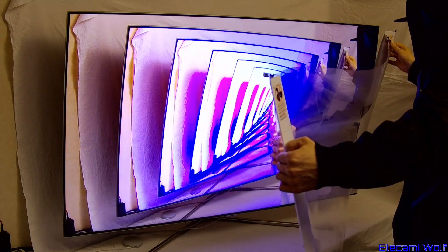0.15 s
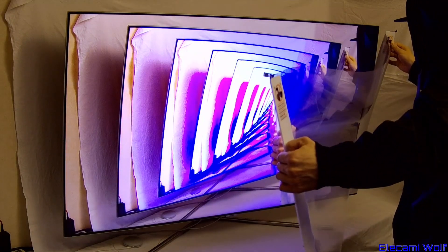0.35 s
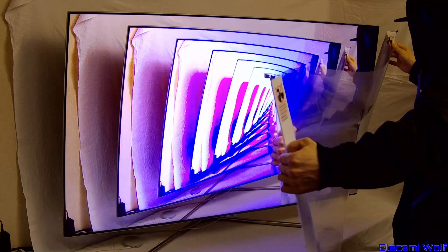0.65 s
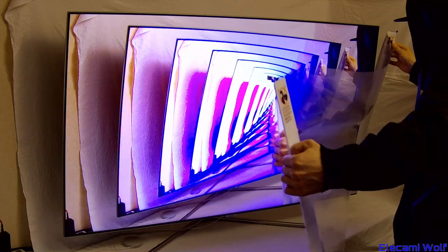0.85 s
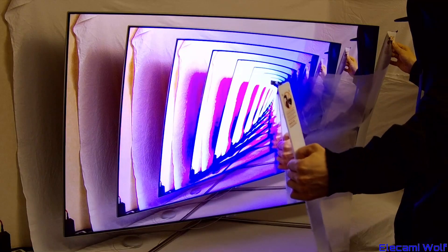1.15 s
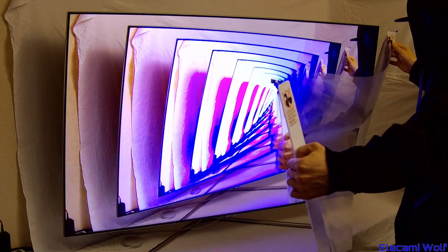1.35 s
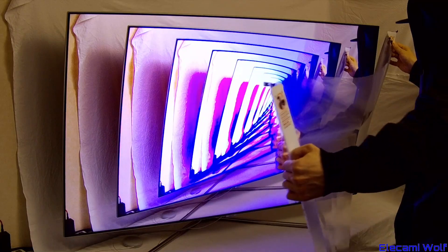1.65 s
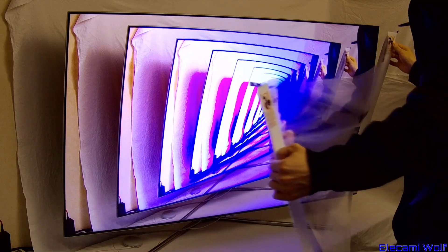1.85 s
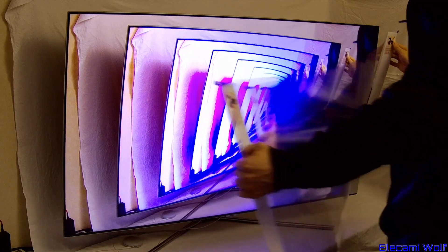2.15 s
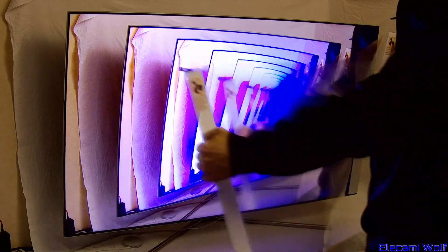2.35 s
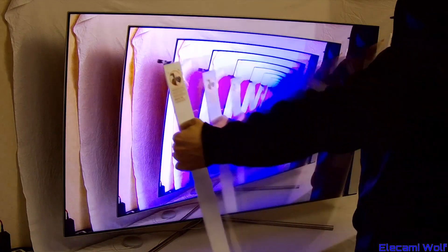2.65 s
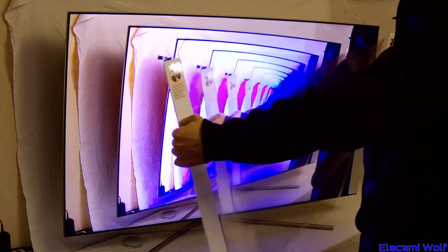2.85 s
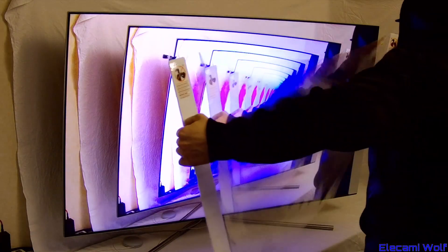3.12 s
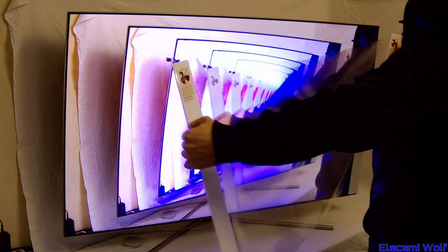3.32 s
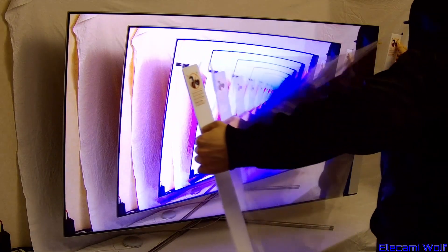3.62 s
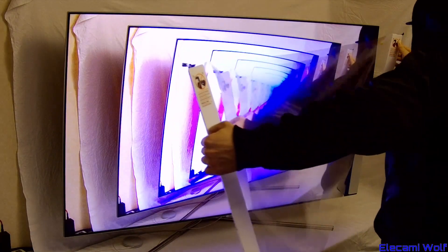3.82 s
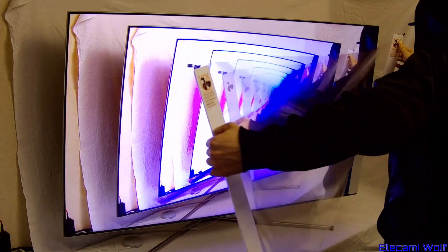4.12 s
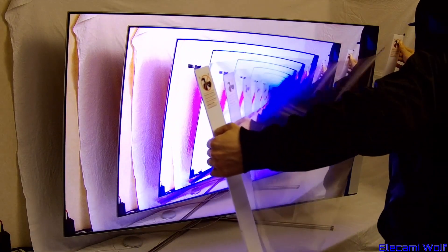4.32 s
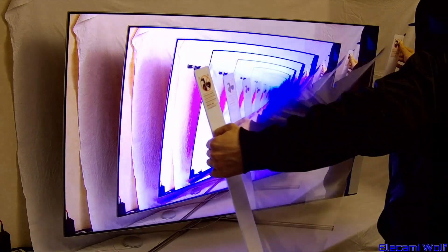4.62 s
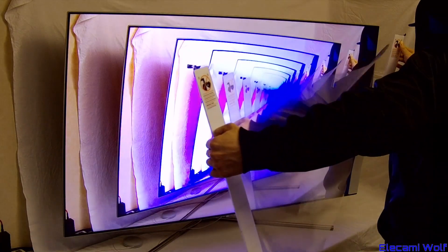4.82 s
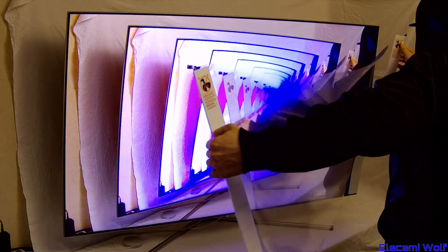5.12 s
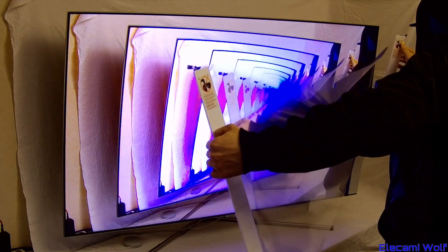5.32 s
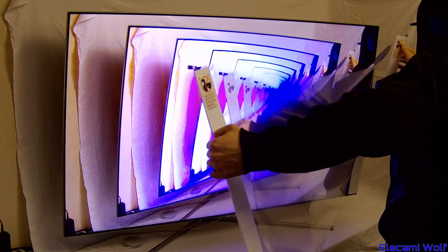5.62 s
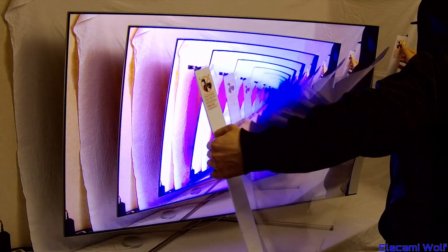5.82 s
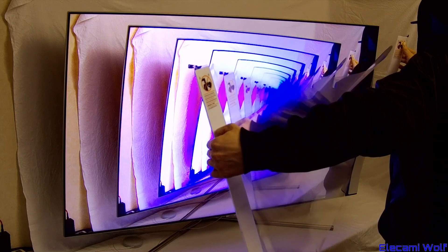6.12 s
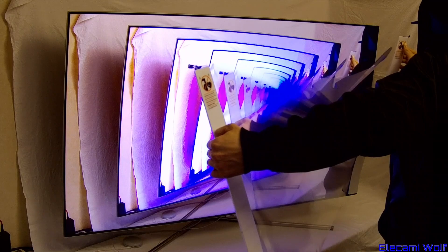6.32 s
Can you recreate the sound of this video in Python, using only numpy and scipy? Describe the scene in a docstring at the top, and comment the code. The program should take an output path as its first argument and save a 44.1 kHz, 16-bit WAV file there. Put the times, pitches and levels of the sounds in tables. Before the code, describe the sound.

Protective plastic is pulled from a big screen indoors, ticking and snapping, crackling steadily for a while, then giving a few last clicks.

```python
"""Protective plastic film peels off a large screen in a small room.
After a faint creep the taut sheet lets go in single snaps, then in a dense run of tiny slips
that rasp more as the pull grows. The loose film crinkles and billows once.
Screen and walls echo it over room air and faint mains hum; an expander turns the pauses down."""
import sys
import numpy as np
from scipy import signal
from scipy.fft import rfft, irfft
from scipy.io import wavfile

SR = 44100
rng = np.random.default_rng(int(sys.argv[2]) if len(sys.argv) > 2 else 0)


def master(y):
    """Save y as 16-bit WAV."""
    cut = np.clip(np.atleast_2d(y).T, -1, 1)
    pcm = np.round(cut * 32767)  # scale
    wavfile.write(sys.argv[1], SR, pcm.astype(np.int16))


N = 285092
TIME_S = np.arange(N) / SR

# room air spectrum: freq_hz, gain_db
AIR_SPECTRUM = [(20, -39), (32, -21), (45, -11.5), (130, -6), (250, -1.5), (420, 1), (600, -6), (790, -6.5),
                (1050, -12), (2500, -20), (4800, -27), (7000, -39), (15000, -57.5)]
# mains hum and faint steady tones: pitch_hz, level_db
HUM_TONES = [(50, -62.5), (100, -66), (150, -73.5), (241, -63.5), (434, -67.5), (785, -68)]
# glue rasp spectrum: freq_hz, gain_db
RASP_SPECTRUM = [(500, -9), (1200, 5.5), (1900, 3.5), (2700, -2.5), (4000, -14), (6300, -31.5),
                 (9000, -46.5), (12000, -53), (16000, -60.5)]
# film patches letting go: start_s, level_db, ring_hz, crack_gain_db, release_ms
SNAP_EVENTS = [(0.633, -45, 1250, -31, 1.8), (0.801, -34.5, 1620, -27, 1.8), (1.021, -43, 980, -9, 1.1),
               (1.06, -55, 2100, -15, 0.61), (1.259, -59.5, 1680, -28, 0.51), (1.563, -63, 1900, -10, 1.2),
               (1.634, -45.5, 1450, -31, 3), (1.677, -17, 1740, -3.5, 1.5), (1.709, -29, 1630, -18, 1.3),
               (1.907, -31, 1610, -2.5, 0.47), (2.269, -35, 1180, -23, 1.9), (2.651, -27.5, 820, -30, 1.6),
               (2.716, -43, 1900, -11, 0.88), (2.826, -33.5, 1660, -21, 2.2), (2.866, -28, 1260, 0.5, 1.4),
               (2.909, -22, 1490, 0, 1.3), (3.009, -20.5, 1690, 3, 4.4), (3.126, -21, 2070, -13, 1.4),
               (3.168, -29, 1500, -28, 0.98), (3.204, -28, 1390, -6, 3.4), (3.232, -31, 1780, 1.5, 2.6),
               (3.326, -25, 1680, -30, 0.83), (3.484, -32, 1310, -23, 2.1), (3.914, -27, 2090, -22, 0.93),
               (4.0, -42, 1310, 2.5, 2.4), (4.12, -34, 1490, -32, 2.3), (4.2, -40, 1520, -7, 1.6),
               (4.356, -35, 1410, -26, 2), (4.516, -45, 1660, 3, 1.5), (4.552, -15.5, 1950, -18.5, 1.3),
               (5.052, -30.5, 1550, -12, 0.45), (5.091, -41.5, 1390, -4, 0.76),
               (5.751, -48, 1430, -14, 0.8), (6.172, -47, 1800, -12, 2.2), (6.182, -36.5, 1586, -22, 0.58),
               (6.24, -50, 1610, -3, 0.84)]
# treble roll-off of the ringing film: freq_hz, gain_db
RING_SPECTRUM = [(3000, 0.5), (6000, -3.5), (10000, -11), (16000, -23.5)]
# slack sheet flap spectrum: freq_hz, gain_db
FLAP_SPECTRUM = [(50, -13.5), (130, -8.5), (220, -2.5), (420, 3.5), (750, .5), (1100, -15.5), (2500, -24.5),
                 (10000, -64.5)]
# tearing glue spectrum: freq_hz, gain_db
CRACK_SPECTRUM = [(1500, -4.5), (3000, 14.5), (4400, 12), (6500, -1.5), (9000, -10.5), (12000, -27.5),
                  (16000, -43)]
# bright ticks of the film, some the sharp edge of a snap: start_s, level_db, pitch_hz
TICK_EVENTS = [(0.773, -61, 3500), (0.84, -46, 6700), (1.696, -31, 4900), (1.715, -33, 4870),
               (2.287, -47.5, 3180), (2.486, -43.5, 4700), (2.717, -38.5, 5070), (3.242, -41, 3400),
               (3.34, -47, 4200), (3.492, -41.5, 5270), (3.577, -47, 5400), (4.552, -37.5, 7420),
               (5.053, -34, 3800), (5.092, -42.5, 3520), (5.757, -54.5, 4790), (6.174, -44, 5730),
               (6.18, -39.5, 4840), (6.241, -55, 4800)]
# film tick spectrum: freq_hz, gain_db
TICK_SPECTRUM = [(600, -13), (2200, 11), (4000, 1.5), (7000, -3.5), (9000, -7), (12000, -14.5),
                 (16000, -24)]
# pull on the running peel, as drumming level: time_s, level_db
PULL_CURVE = [(1.75, -35), (1.87, -41), (1.98, -39.5), (2.06, -33), (2.2, -36), (2.44, -35), (2.58, -31.5),
              (2.63, -37), (2.77, -40.5), (2.97, -34.5), (3.18, -35.5), (3.33, -41), (3.4, -36),
              (3.57, -39), (3.71, -32.5), (3.84, -40), (4.02, -37.5), (4.08, -45.5), (4.24, -39),
              (4.33, -59.5), (4.431, -45.5), (4.491, -72)]
# drumming sheet spectrum: freq_hz, gain_db
DRUM_SPECTRUM = [(40, -36.5), (70, -15.5), (125, -13), (240, -4.5), (330, -6), (500, 1), (760, 5),
                 (1000, -3), (1700, -12), (2600, -33), (5000, -39.5), (12000, -83.5)]
# screen panel resonances: freq_hz, width_hz, gain_db
PANEL_MODES = [(818, 28, -5.5), (1630, 30, -21.5), (1930, 70, -8), (2338, 40, -40), (4550, 12, -21),
               (4750, 68, -17.5), (5000, 13, -11)]
# echoes off screen, floor and walls: delay_s, gain_db
ECHO_PATHS = [(.0029, -8), (.0063, -8), (.0098, -20.5), (.0160, -7), (0.0362, -21.5)]
# diffuse room tail: freq_hz, t60_s, gain_db
ROOM_BANDS = [(120, 0.7, 7.5), (390, 0.46, 7), (890, 0.34, 0.5), (2050, 0.24, -5.5), (4500, 0.23, -4.5),
              (8740, 0.17, -4.5), (15000, 0.094, -11)]


def undb(db):
    """Decibels to gain."""
    return 10 ** (np.asarray(db) / 20)


def unit_rms(x):
    """Scale to rms 1."""
    return x / np.sqrt(np.mean(x ** 2) + 1e-30)


def log_interp(hz, points):
    """Interpolate (freq_hz, value) rows over log frequency."""
    freq_hz, values = np.array(points, float).T
    return np.interp(np.log(np.maximum(hz, 1)), np.log(freq_hz), values)


def colour(x, spectrum, size=2048):
    """Minimum-phase filter; attacks stay sharp."""
    gain = undb(log_interp(np.fft.rfftfreq(size, 1 / SR), spectrum))
    cepstrum = irfft(np.log(gain))
    cepstrum[1:size // 2] *= 2
    cepstrum[size // 2 + 1:] = 0
    response = irfft(np.exp(rfft(cepstrum)))
    return signal.oaconvolve(x, response)[:len(x)]


def bandpass(x, hz, q):
    """Two-pole resonator."""
    omega = 2 * np.pi * min(hz, SR / 2 - SR / 20) / SR
    alpha = np.sin(omega) / (2 * q)
    return signal.lfilter([alpha, 0, -alpha], [1 + alpha, -2 * np.cos(omega), 1 - alpha], x)


def add(track, start_s, x):
    """Mix x into the track."""
    start = max(int(round(start_s * SR)), 0)
    track[start:start + len(x)] += x[:max(len(track) - start, 0)]


def drift(rate_hz):
    """Smooth random drift, spread near 1."""
    knots = rng.standard_normal(N // 100)
    return np.interp(TIME_S * rate_hz, np.arange(len(knots)), knots)


def air_and_hum(air_db=-55.0):
    """Steady room air, mains hum and faint tones."""
    air = unit_rms(colour(rng.standard_normal(N), AIR_SPECTRUM)) * undb(air_db)
    hum = sum(np.sqrt(2) * undb(db) * np.sin(2 * np.pi * hz * TIME_S) for hz, db in HUM_TONES)
    return air + hum


def slips(size, rate_hz, spread_db):
    """Tiny glue releases at random times: many weak, a few strong."""
    chance, rarity = rng.random((2, size))
    fired = np.flatnonzero(chance < rate_hz / SR)
    strength_db = -spread_db * np.log(np.maximum(rarity[fired], .02))
    out = np.zeros(size)
    out[fired] = (-1.) ** fired * undb(strength_db)
    return out


def creep(peak_s=.505, width_s=.064, level_db=-59.5):
    """Under the first light pull, slips rasp faintly, swell and stop."""
    swell = np.exp(-((TIME_S - peak_s) / width_s) ** 2)
    rasp = unit_rms(colour(slips(N, rate_hz=1800, spread_db=2.0), RASP_SPECTRUM))
    return rasp * swell * undb(level_db)


def film_response(push, tear, ring_hz, flap_db, crack_db):
    """A push rings the taut film and flaps the sheet; tearing glue cracks."""
    ring = bandpass(bandpass(push, ring_hz, q=.85), ring_hz, q=1.0)
    ring = unit_rms(colour(ring, RING_SPECTRUM))
    flap = unit_rms(colour(push, FLAP_SPECTRUM)) * undb(flap_db - 2.5)
    crack = unit_rms(colour(tear, CRACK_SPECTRUM)) * undb(crack_db - 7.0)
    # high bending waves run faster: crack first, flap last
    ring = np.pad(ring, (SR // 1500, 0))
    flap = np.pad(flap, (SR // 1000, 0))
    return crack + ring[:len(push)] + flap[:len(push)]


def snaps(tails, typical_db=-35, size=1024):
    """Each patch lets go in an avalanche of slips, milliseconds long."""
    out = np.zeros(N)
    time_ms = 1000 * np.arange(size) / SR
    impulse = signal.unit_impulse(size)
    for k, (start_s, level_db, ring_hz, crack_db, release_ms) in enumerate(SNAP_EVENTS):
        # weak snaps flap the slack sheet, strong ones ring it taut
        flap_db = min(-3 - .5725 * (level_db - typical_db), 4.5)
        age = time_ms / release_ms
        avalanche = slips(size, rate_hz=12000, spread_db=2.0)
        push = avalanche * (age + .067) * np.exp(-age * .51)
        tear = avalanche * np.exp(-age)
        direct = film_response(push, tear, ring_hz, flap_db, crack_db)
        # the room sums all directions, so it gets the smooth average colour
        diffuse = film_response(impulse, impulse, ring_hz, flap_db, crack_db)
        gain = undb(level_db - 4.5)
        add(out, start_s - .0002, gain * with_echoes(direct, echo_db=-3.0, delay_spread=.13))
        add(out, start_s, gain * signal.fftconvolve(diffuse, tails[k % len(tails)]))
    return out


def ticks(tails, size=512):
    """Short bright film ticks with strong echoes: crinkles, lone ticks, sharp edges of snaps."""
    out = np.zeros(N)
    scatter_decay = np.exp(-np.arange(size) / SR / .0007)
    for k, (start_s, level_db, pitch_hz) in enumerate(TICK_EVENTS + crinkle_events()):
        pulse = signal.unit_impulse(size) + .13 * rng.standard_normal(size) * scatter_decay
        tick = undb(level_db) * unit_rms(colour(bandpass(pulse, pitch_hz, q=1.0), TICK_SPECTRUM))
        add(out, start_s + .00071, with_echoes(tick, echo_db=5.0, delay_spread=.023))
        add(out, start_s, undb(3.5) * signal.fftconvolve(tick, tails[k % len(tails)]))
    return out


def peel(tails, typical_db=-34.5, rasp_db_per_db=.57):
    """Slips along the peel line drum on the sheet; rasp outgrows drumming as the pull rises."""
    knots_s, knots_db = np.transpose(PULL_CURVE)
    start_s, end_s = knots_s[0], knots_s[-1]
    running = np.interp(TIME_S, [start_s - .01, start_s, end_s, end_s + .02], [0, 1, 1, 0])
    surge_db = .3 * drift(rate_hz=33)  # glue holds and gives
    pull_db = np.interp(TIME_S, knots_s, knots_db) + surge_db
    rasp_db = pull_db + rasp_db_per_db * (pull_db - typical_db)
    jerk_db = 2.5 * np.tanh(drift(rate_hz=80))
    cluster_db = 4.5 * np.tanh(drift(rate_hz=260))  # slips set off their neighbours
    drum_slips = slips(N, rate_hz=1500, spread_db=4.4)
    rasp_slips = slips(N, rate_hz=1300, spread_db=2.6) * undb(cluster_db)
    drum = unit_rms(colour(drum_slips, DRUM_SPECTRUM)) * undb(pull_db - 4.5)
    rasp = unit_rms(colour(rasp_slips, RASP_SPECTRUM)) * undb(rasp_db - 3.94)
    direct = running * undb(jerk_db) * (drum + rasp)
    return moving_in_room(direct, tails, start_s - .02, end_s + .02)


def moving_in_room(x, tails, start_s, end_s, fade_size=256):
    """The peel line moves: each crossfaded stretch gets its own room response."""
    out = np.zeros(N)
    edges = (np.linspace(start_s, end_s, 3 * len(tails)) * SR).astype(int)
    fade = np.hanning(fade_size) / np.hanning(fade_size).sum()
    for k, (start, end) in enumerate(zip(edges, edges[1:])):
        window = signal.fftconvolve(np.ones(end - start), fade)
        stretch = x[start:start + len(window)] * window
        add(out, start / SR, with_echoes(stretch, echo_db=-3.5, delay_spread=.2))
        add(out, start / SR, undb(-1.5) * signal.fftconvolve(stretch, tails[k % len(tails)]))
    return out


def billow(flop_hz=103, flutter_hz=38):
    """The loose sheet swings out: a soft flop, then a low, uneven, dying flutter."""
    flop = bandpass(rng.standard_normal(N), flop_hz, q=1.3)
    flop = unit_rms(bandpass(flop, flop_hz, q=1.3))
    swing_hz = flutter_hz * (1 + .11 * drift(rate_hz=25))
    flutter = unit_rms(np.sin(2 * np.pi * np.cumsum(swing_hz) / SR))
    flop_db = np.interp(TIME_S, [2.04, 2.1, 2.145, 2.22], [-79, -44, -37.5, -69], left=-150, right=-150)
    flutter_db = np.interp(TIME_S, [2.08, 2.16, 2.28, 2.45, 3.1], [-61, -42, -51, -58.5, -74],
                           left=-150, right=-150)
    return flop * undb(flop_db) + flutter * undb(flutter_db)


def crinkle_events(from_s=2.05, to_s=4.2, count=16):
    """Small creases flip at uneven intervals as the freed film is carried along."""
    jitter, strength, pitch = (2 * rng.random((count, 3)) - 1).T
    start_s = from_s + (to_s - from_s) * (np.arange(count) + .5 + jitter / 2) / count
    level_db = -56.5 + 4 * strength
    pitch_hz = 2900 * 2 ** (.25 * pitch)
    return list(zip(start_s, level_db, pitch_hz))


def screen_panel(x):
    """The film shakes the screen, which adds its resonances."""
    return x + sum(undb(db) * bandpass(x, hz, q=hz / width_hz) for hz, width_hz, db in PANEL_MODES)


def with_echoes(x, echo_db, delay_spread, size=2048):
    """Direct sound plus hard echoes; paths vary from place to place."""
    response = signal.unit_impulse(size)
    for delay_s, gain_db in ECHO_PATHS:
        arrival_s = delay_s * (1 + delay_spread * rng.standard_normal())
        add(response, arrival_s, undb([gain_db + echo_db]))
    return signal.fftconvolve(x, response)


def room_tails(count=12, rise_s=.0013, size=16384):
    """Diffuse tails for several places on the sheet; treble dies first."""
    time_s, freq_hz = np.arange(size) / SR, np.fft.rfftfreq(size, 1 / SR)
    centres_hz = np.array(ROOM_BANDS)[:, 0]
    noise_spectra = rfft(rng.standard_normal((count, size)))
    tails = np.zeros((count, size))
    for share, (_, t60_s, gain_db) in zip(np.eye(len(ROOM_BANDS)), ROOM_BANDS):
        band = irfft(noise_spectra * log_interp(freq_hz, np.column_stack([centres_hz, share])))
        envelope = np.exp(-np.log(1000) * time_s / t60_s) * (1 - np.exp(-time_s / rise_s))
        tails += band * unit_rms(envelope) * undb(gain_db) / np.sqrt(size)
    return tails


def expander(x, threshold_db=-52.5, knee_db=3.2, depth_db=11, size=1400):
    """Turns the sound down while its recent level is low."""
    power = signal.lfilter(np.ones(size) / size, [1], x ** 2)
    level_db = 10 * np.log10(power + 1e-18)
    opening = np.clip((level_db - threshold_db) / knee_db, 0, 1)
    return x * undb(depth_db * (opening - 1))


def scene():
    """Film, screen and room at one microphone."""
    tails = room_tails()
    film = snaps(tails) + ticks(tails) + peel(tails) + creep()
    return (screen_panel(film) + billow() + air_and_hum())[None]


def record(dry):
    """Rumble cut, expander, top cut."""
    low_hz, top_hz = 31, 15900
    rumble_cut = signal.butter(6, low_hz, "high", fs=SR, output="sos")
    top_cut = signal.ellip(8, .2, 70, top_hz, fs=SR, output="sos")
    expanded = expander(signal.sosfilt(rumble_cut, dry[0]))
    return signal.sosfilt(top_cut, expanded)[None]


dry = scene()
out = record(dry)
master(out)
```